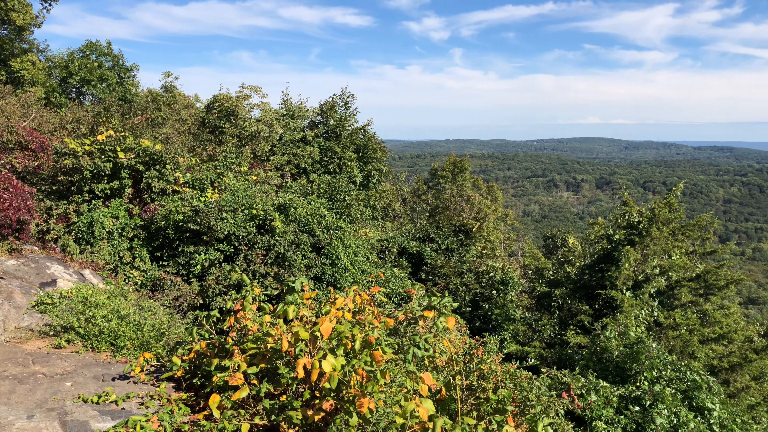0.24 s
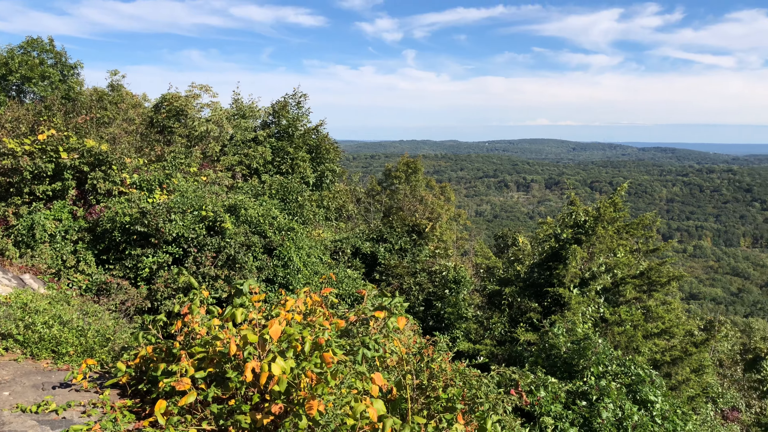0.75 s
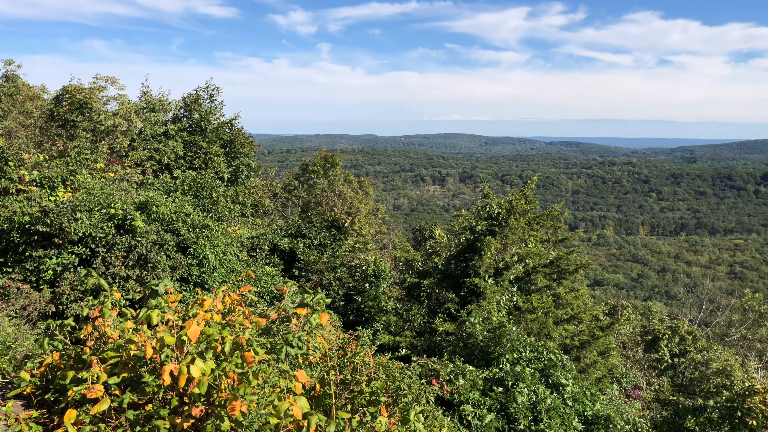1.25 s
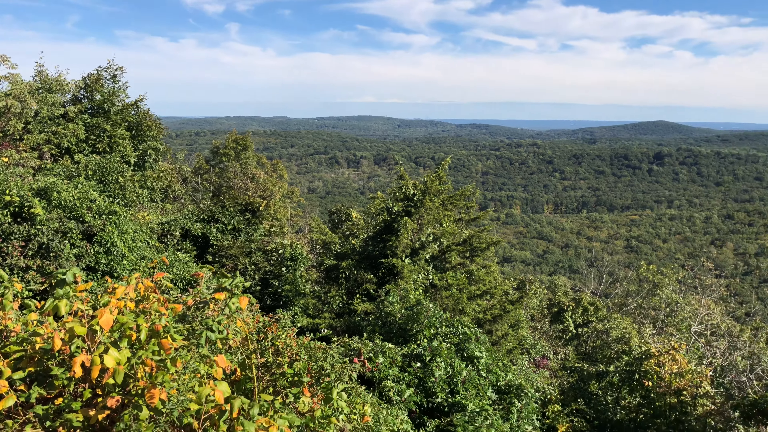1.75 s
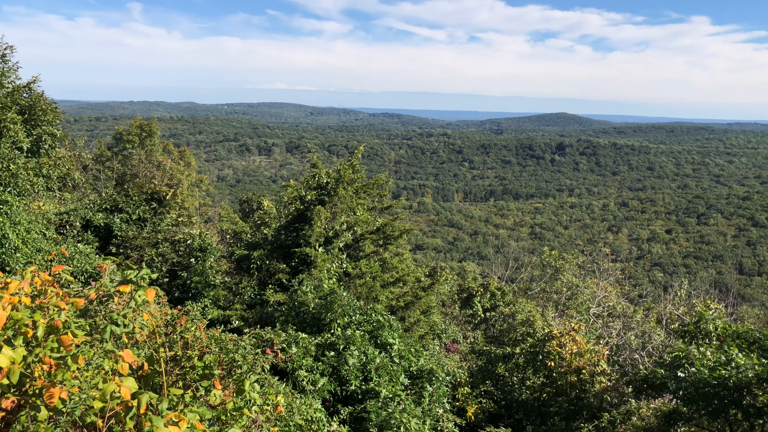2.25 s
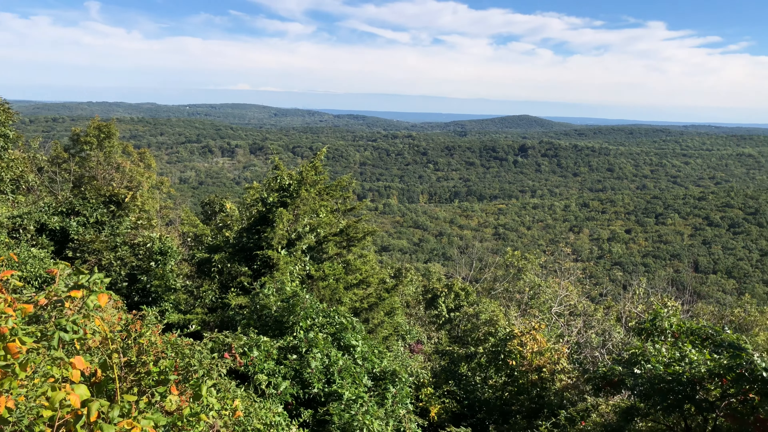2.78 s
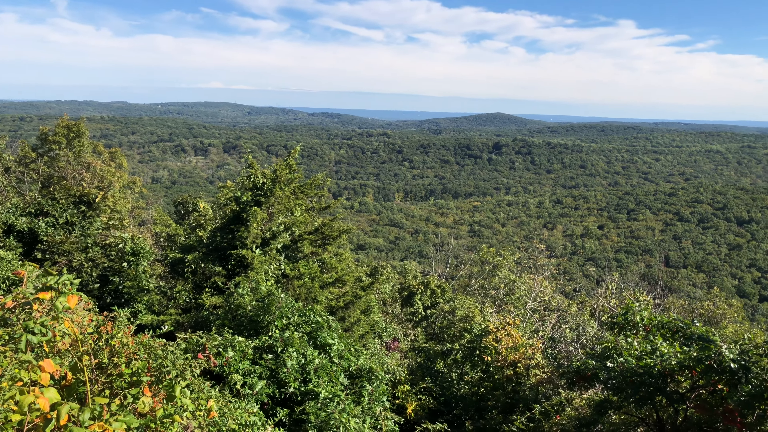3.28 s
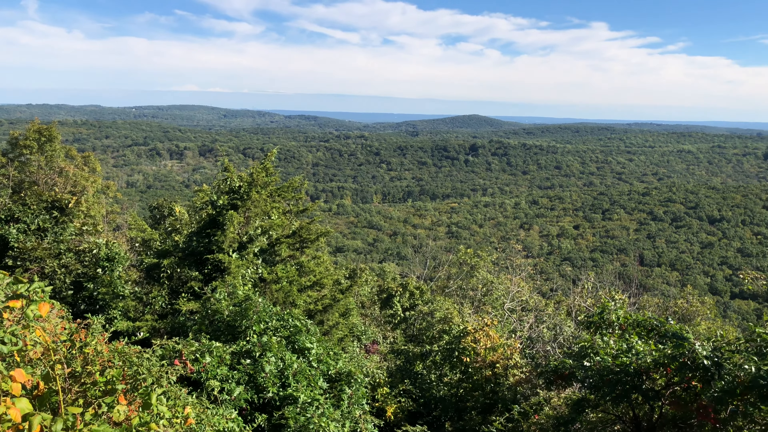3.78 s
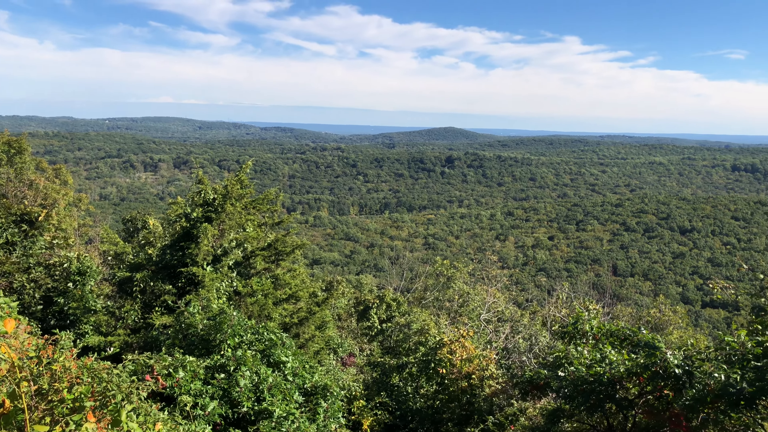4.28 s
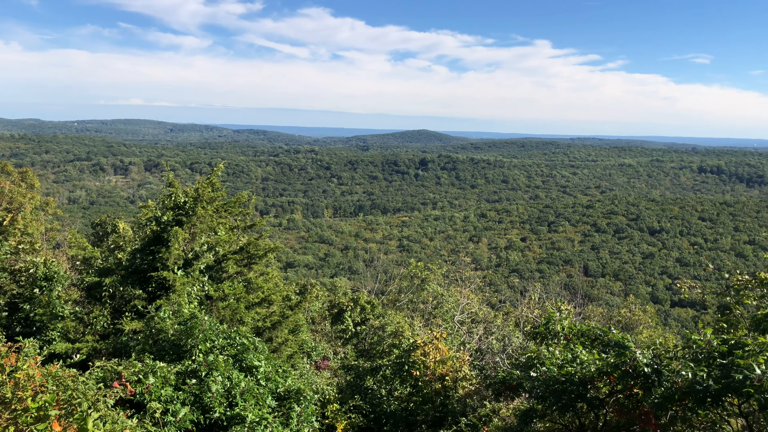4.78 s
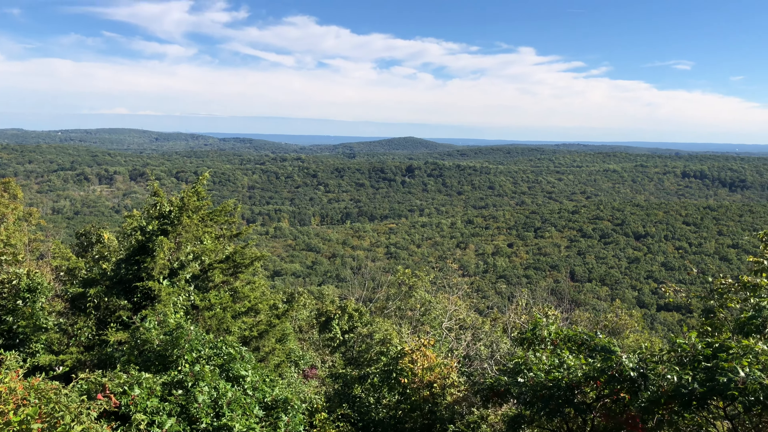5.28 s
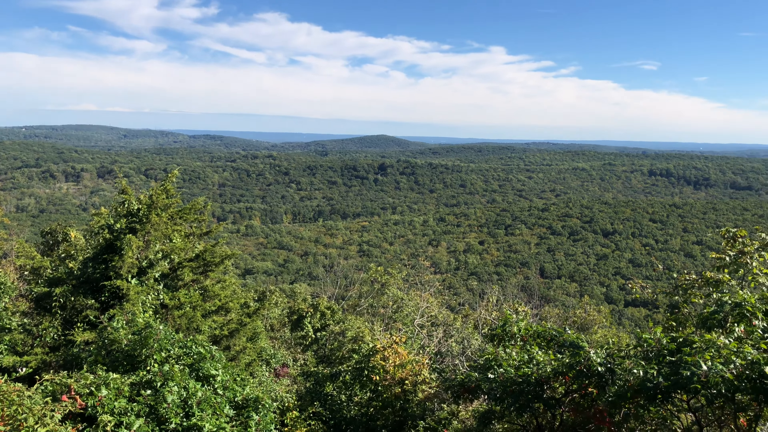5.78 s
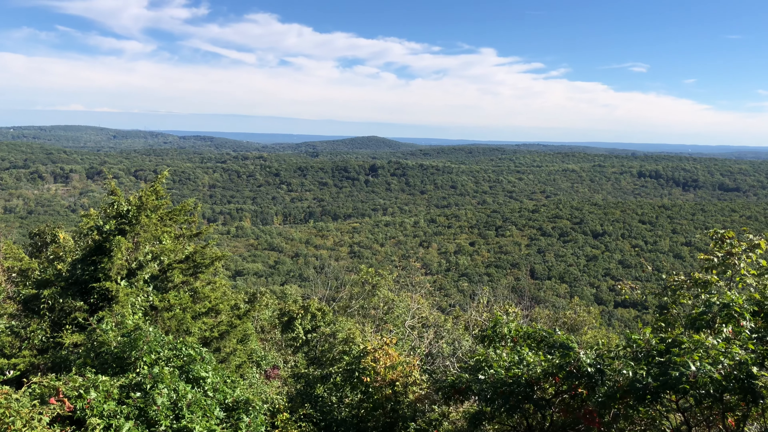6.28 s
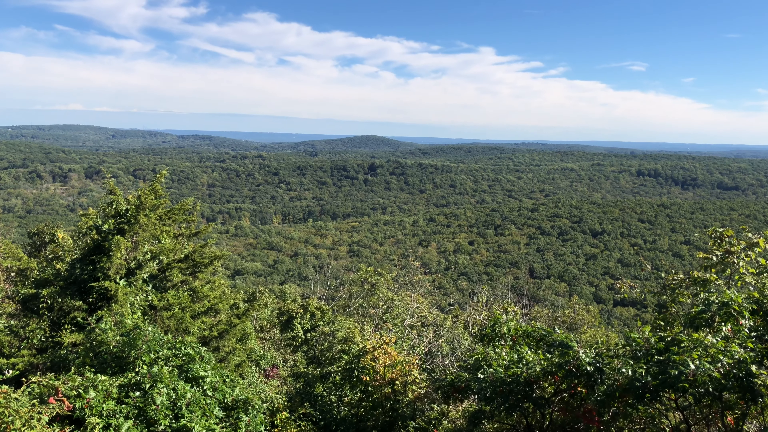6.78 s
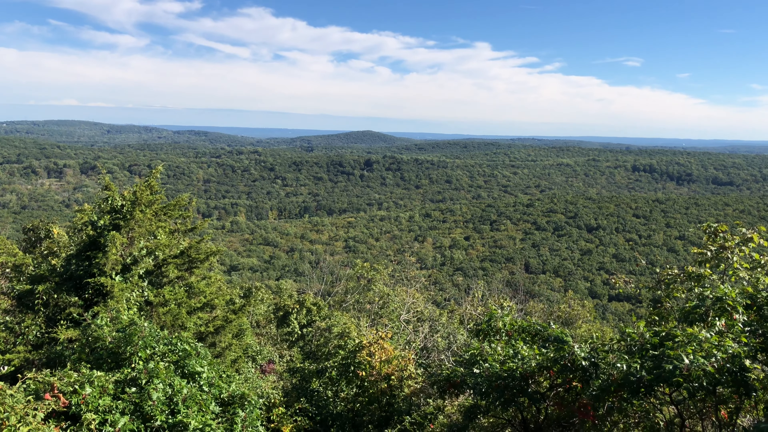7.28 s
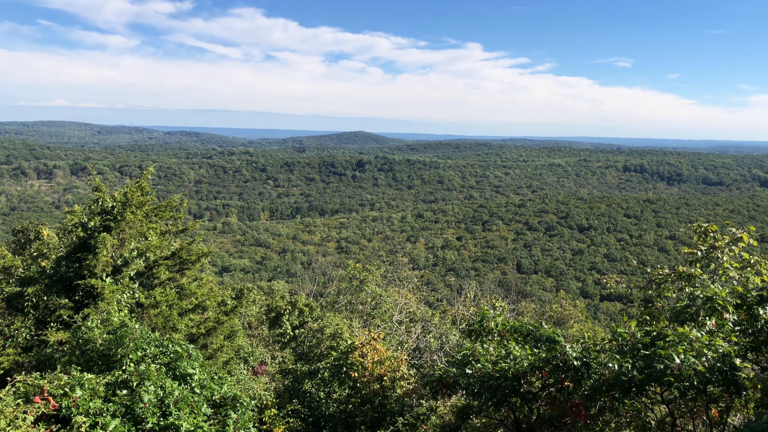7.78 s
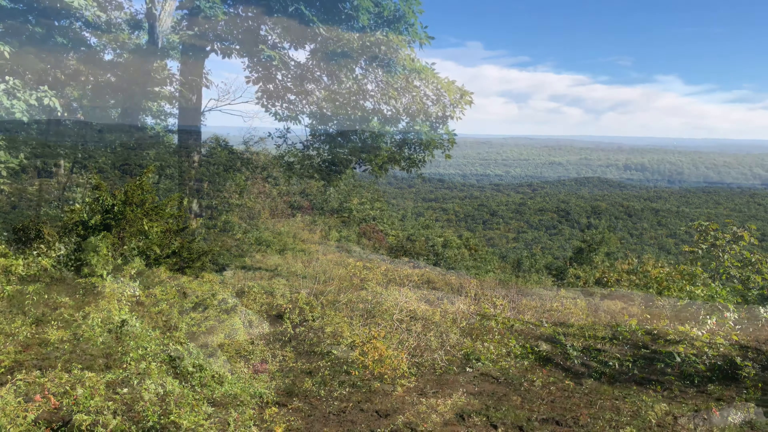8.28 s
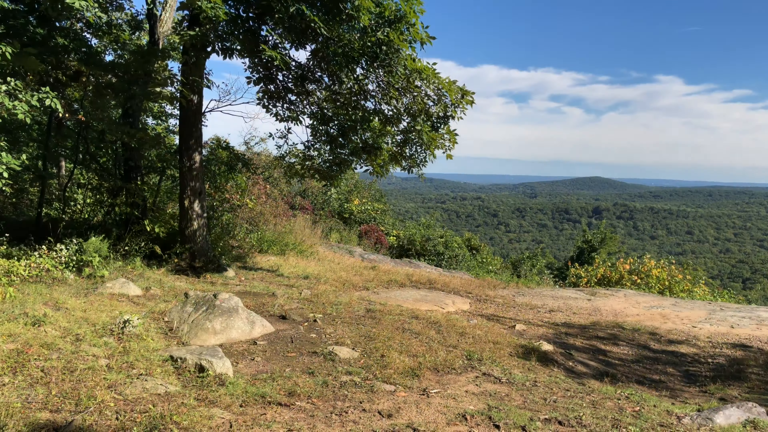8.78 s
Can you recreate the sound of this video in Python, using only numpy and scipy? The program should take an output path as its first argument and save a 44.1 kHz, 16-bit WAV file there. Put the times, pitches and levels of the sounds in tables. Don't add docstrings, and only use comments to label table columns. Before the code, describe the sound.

A continuous silvery mass of ground crickets fills open air, with a closer cricket giving quick pure-toned chirps near 4.8 kilohertz. Others flutter faintly downslope. A distant raven gives a rattling croak, later a softer one and a clipped remnant. Finger bumps and dry ticks sit close to the microphone above faint wind. Near the end, the chirper fades and higher single-note tinkles at regular paces blend in, with a brief stuttering trill.

```python
import sys
import numpy as np
from scipy import signal
from scipy.fft import rfft, irfft, next_fast_len
from scipy.io import wavfile
from scipy.ndimage import uniform_filter1d, map_coordinates

SR = 44100
rng = np.random.default_rng(int(sys.argv[2]) if len(sys.argv) > 2 else 0)


def ratio_of_db(decibels):
    return 10 ** (np.asarray(decibels, float) / 20)


def log_audio(samples):
    frames = np.atleast_2d(samples).T
    limited = np.clip(frames, -1, 1)
    pcm = np.round(limited * 32767).astype(np.int16)
    wavfile.write(sys.argv[1], SR, pcm)


N = 398663
T = np.arange(N) / SR

# (time of the middle full stroke [s], lengths of the three full strokes [ms] x 3)
NEAR_CHIRPS = [(0.1022, 20, 20, 17), (0.415, 17, 17, 17), (0.814, 19, 17.5, 20), (1.122, 11, 11, 20.5),
               (1.449, 15, 17.5, 21), (1.7912, 17, 8.7, 20), (2.096, 16, 9.3, 19), (2.447, 12, 8.7, 11),
               (2.788, 14.5, 15.5, 20.5), (3.098, 16.4, 18, 17), (3.4119, 16, 15.7, 16.5),
               (3.732, 10.3, 17.5, 18.5), (4.0724, 19.6, 8.4, 15), (4.379, 15, 18.4, 19),
               (4.7503, 16.6, 20, -2.5), (5.012, 16.4, 18, 8), (5.4656, 11, 16, 8.5), (5.829, 19, 15, 19),
               (6.163, 16, 8.6, 14.5), (6.4968, 10.6, 19, 19.5), (6.834, 21, 17, 17),
               (7.314, 11, 15.4, 18.5), (7.626, 17, 10, 15), (7.9104, 16, 13.5, 16.5), (8.221, 16, 17, 19),
               (8.526, 19, 19, 19.5)]
# (pause before the next [ms], level [dB], wing pitch at the usual length [Hz])
NEAR_STROKES = [
    (29.3, -6.5, 4830),
    (42.2, -0.95, 4830),
    (45.1, 0, 4855),
    (0, 0.5, 4865),
]
# (time [s], level [dB])
FACING = [
    (.1, -52.5),
    (.45, -49.5),
    (.8, -49),
    (1.45, -46.5),
    (1.8, -42.5),
    (2.45, -41),
    (3.1, -40),
    (9, -40),
]
LEAD_MS, USUAL_MS = 9.9, 17
LONGER_WAITS_MS, LONGER_DB, LONGER_HZ = .22, -0.2, 5.9

# (first stroke [s], time between strokes [s], stroke length [ms], level [dB])
TINKLE_HIGH = (8.162, .108, 16.5, -47)
TINKLE_MID = (8.172, .1362, 18.5, -41.5)
TINKLE_LOW = (8.087, .1577, 22.5, -58)
TINKLE_TOP = (8.206, .117, 15, -77)
# (time
# [s], length [ms], level [dB], wing pitch [Hz])
BURST_STROKES = [(8.328, 13, -59, 4750), (8.358, 21, -56.5, 4640), (8.403, 17, -57.5, 4620),
                 (8.43, 12, -61, 4600), (8.815, 11, -62, 4750), (8.829, 13, -56.5, 4700),
                 (8.858, 19, -55, 4620), (8.885, 12, -56, 4650), (8.906, 19, -51, 4640),
                 (8.934, 11, -53, 4580), (8.949, 18.7, -53, 4640), (8.97, 10, -59, 4710),
                 (8.985, 10, -59, 4620), (9.0, 15, -59, 4600), (9.02, 14, -59, 4480)]
DISSOLVE_START_S, DISSOLVE_END_S = 7.85, 8.88

# (time of the last stroke [s], length [s], level [dB])
SLOPE_CHIRPS = [(.072, .06, -68), (.592, 0.23, -65), (1.056, 0.23, -66.5), (1.443, .16, -66),
                (1.84, 0.15, -64), (2.241, 0.14, -65), (2.671, 0.21, -67), (3.14, .16, -68),
                (3.59, 0.19, -68), (3.995, 0.17, -66), (4.38, 0.19, -65), (4.824, 0.19, -64.5),
                (5.222, 0.19, -64.5), (5.647, .2, -68), (6.08, 0.18, -65.5), (6.535, .2, -65.5),
                (6.964, 0.22, -66), (7.39, .18, -65), (7.772, 0.19, -64), (8.133, 0.1, -69)]
# (time [s], length [s], level [dB])
FAR_LOW_CHIRPS = [(.072, .14, -68), (.482, .17, -74), (.872, .17, -73), (1.277, 0.18, -72),
                  (1.625, .18, -72), (2.0, .18, -70), (2.382, 0.15, -72), (2.75, 0.16, -72),
                  (3.14, .18, -72), (3.48, 0.16, -74), (3.916, .2, -73), (4.27, 0.15, -72),
                  (4.695, 0.14, -69), (5.078, 0.15, -72), (5.447, .14, -71), (5.743, 0.14, -70),
                  (6.112, .17, -72), (6.49, 0.19, -73), (6.84, .2, -75), (7.288, 0.16, -73),
                  (7.67, 0.16, -75), (8.065, .1, -72)]
# (time [s], length [s], level [dB])
FAINT_CHIRPS = [(.6, 0.13, -73), (1.03, 0.18, -73), (1.53, .17, -71), (1.9, .19, -73), (2.84, 0.13, -73),
                (3.69, 0.1, -73), (4.17, .13, -74), (4.6, 0.096, -75), (5.0, .13, -76), (5.4, 0.18, -76),
                (5.85, 0.2, -75), (6.25, 0.15, -72), (7.18, 0.16, -74)]
# (time [s], length [s], level [dB])
FAR_HIGH_CHIRPS = [(0.25, 0.076, -65), (0.496, 0.17, -67), (0.948, 0.18, -69), (1.326, 0.23, -69),
                   (1.672, 0.18, -72), (2.002, 0.15, -68), (2.369, 0.1, -66), (2.717, 0.21, -71),
                   (3.166, 0.15, -70), (3.499, 0.21, -70), (3.941, 0.15, -70), (4.297, 0.14, -68),
                   (4.621, 0.18, -69), (4.97, 0.15, -74), (5.295, 0.17, -73), (5.643, 0.12, -72),
                   (5.911, 0.2, -72), (6.243, 0.18, -71), (6.587, 0.18, -70.9), (6.935, 0.14, -70),
                   (7.241, 0.14, -72.3), (7.579, 0.2, -73), (7.908, 0.17, -72)]
# (time [s], level [dB])
GRASS_STROKES = [(1.627, -61), (1.662, -65), (2.287, -59), (2.333, -58), (3.284, -63), (3.875, -66),
                 (3.905, -65), (3.948, -62), (3.985, -62), (4.567, -63), (4.624, -56), (4.799, -60),
                 (4.841, -60), (5.113, -57), (5.15, -60), (5.189, -58), (5.243, -59), (5.555, -58),
                 (5.594, -58), (5.643, -59), (5.691, -60), (5.989, -65), (6.03, -59), (6.064, -57),
                 (6.243, -64), (6.285, -63), (6.581, -55), (6.645, -59), (6.929, -64), (6.97, -63),
                 (7.014, -58), (7.06, -57), (7.396, -59), (7.425, -58), (7.476, -56), (7.52, -56),
                 (7.713, -66), (7.751, -67), (8.001, -59), (8.044, -58), (8.085, -67)]

# (wing pitch [Hz], strokes a second [1/s], level [dB])
SINGERS = [(6850, 31.5, -11), (7260, 64, 0), (7525, 69, 1), (7750, 26, -3.5), (7070, 98, -6),
           (8100, 64, -14.5), (8204, 30, -13)]
# (time [s], level [dB])
TRILL_LEVEL = [
    (0.0, -54),
    (3.65, -55),
    (4.48, -54.5),
    (7.75, -54.5),
    (8.36, -59),
    (9.04, -56.5),
]
# (frequency [Hz], level [dB per Hz])
MASS_COLOUR = [(3710, -47), (6300, -16), (6510, -14.5), (7050, 1.5), (7500, 2.5), (7980, -5.5),
               (8550, -16.5), (9200, -16), (12000, -59), (20200, -120)]
# (time [s], level [dB])
MEADOW_LEVEL = [
    (0, -55),
    (.2, -63),
    (1.1, -60),
    (2.7, -62),
    (4.3, -61.5),
    (5.7, -62),
    (7.4, -61.5),
    (8.45, -59),
    (8.62, -58),
]
# (frequency [Hz], level [dB per Hz])
MEADOW_COLOUR = [(3900, -42), (4200, -12), (4500, -22), (4800, -14.5), (5050, -10), (5400, -34)]

# (start [s], length [s], level [dB], throbs a second [1/s])
CROAKS = [
    (2.654, 0.25, -54, 53.1),
    (4.791, .185, -61.5, 58),
    (5.245, 0.056, -62, 50),
]
# (time [s], second harmonic [Hz])
CROAK_PITCH = [(2.66, 1082), (2.75, 1131), (2.82, 1154), (2.85, 1102), (2.92, 1060), (4.8, 1015),
               (4.98, 1024), (5.25, 995)]
# (frequency [Hz], level [dB])
THROAT = [(300, -7), (550, -7), (830, -16), (1100, 0.5), (1240, -1), (1420, -9.5), (1650, -11),
          (2200, -29.5), (2900, -16.5), (3700, -23.5), (5000, -46)]

# (time [s], peak level [dB], lowest frequency [Hz], highest frequency [Hz])
KNOCKS = [(.741, -46, 110, 320), (0.772, -51, 850, 3400), (.988, -50, 650, 1100), (0.995, -51.5, 650, 1250),
          (.997, -56, 1200, 2100), (1.012, -58, 1000, 2000), (1.038, -57, 2200, 3200),
          (1.04, -42.5, 120, 700), (1.8548, -47.5, 400, 1500), (1.933, -49.5, 960, 4200),
          (1.944, -51, 900, 1900), (2.172, -40.5, 198, 1390), (2.178, -42, 130, 1200),
          (2.884, -50, 700, 840), (4.836, -46, 380, 550), (4.834, -60, 2340, 3795),
          (4.834, -58, 1300, 2000), (4.932, -53, 1180, 1450), (4.937, -62, 1690, 1900),
          (5.247, -54, 1470, 1566), (5.25, -56, 1150, 1387), (5.268, -58, 1420, 1570),
          (5.29, -62, 1420, 1600), (5.315, -64, 1420, 1600), (5.77, -50.5, 724, 880),
          (7.314, -57, 810, 1028), (7.413, -57, 520, 704), (7.45, -51, 300, 1407)]
# (time [s], peak level [dB], centre frequency [Hz])
TICKS = [(1.8527, -59, 10300), (1.9415, -61, 11200), (2.1655, -65, 9630), (3.2565, -59, 12800),
         (3.2919, -59, 10100), (3.5972, -61, 10800), (3.6311, -62, 11000), (3.6731, -61, 10800),
         (6.0876, -62, 9550), (6.1195, -60, 11000), (6.1519, -62, 9510), (6.3679, -60, 11100),
         (6.3959, -59, 9490), (6.9481, -59, 9220)]

# (time [s], level [dB])
WIND_LEVEL = [(0, -64.5), (.4, -62), (2.4, -64), (3.4, -64.5), (3.7, -56.5), (5.6, -57.5), (5.8, -67),
              (6.2, -63), (7.8, -66.5), (8.45, -66.5), (9.04, -64.5)]
# (frequency [Hz], level [dB per Hz])
RUMBLE_COLOUR = [(13, -33), (22, -25), (48, 5), (91, 7), (173, -6.5), (210, -33), (250, -27), (320, -51),
                 (550, -120)]
# (frequency [Hz], level [dB per Hz])
HUSH_COLOUR = [(35, -20), (60, -2.5), (161, 0.5), (715, -12.5), (964, -17.5), (1370, -21.5), (1880, -25.5),
               (3790, -29.5), (4000, -34), (5200, -67), (8800, -120)]
# (frequency [Hz], level [dB per Hz])
HISS_COLOUR = [(500, -19), (1200, 1.5), (2500, -5), (4000, -1.5), (5700, 3.5), (6600, 3.5), (8800, -12.5),
               (10200, -2.5), (12500, -11), (14400, -7.5), (15950, -14)]
# (time [s], length [s], highest frequency lost [Hz])
TREBLE_GAPS = [(.14, .065, 11000), (.23, .035, 9700), (.6, .045, 10200), (.68, .03, 10400),
               (.95, .03, 10400), (2.53, .02, 10300), (2.595, .05, 9900), (3.19, .055, 9900),
               (3.85, .03, 9200), (3.91, .07, 9700), (4.1, .05, 9100), (4.82, .03, 9900), (5.1, .02, 9700),
               (6.04, .03, 9900), (8.04, .12, 9900), (8.39, .05, 9600), (8.59, .055, 10200),
               (8.7, .045, 10200), (8.8, .015, 10600), (8.99, .03, 9700)]


def unit(x):
    return x / np.sqrt(np.mean(x ** 2) + 1e-20)


def curve(rows):
    return np.interp(T, *np.transpose(rows))


def wobble(rate):
    return map_coordinates(rng.standard_normal(int(N * rate / SR) + 4), [T * rate])


def coloured(x, points):
    m = next_fast_len(N + 8192)
    hz, db = np.transpose(points)
    axis = np.log(np.fft.rfftfreq(m, 1 / SR) + 1)
    gain = ratio_of_db(np.interp(axis, np.log(hz), db, -120, -120))
    return irfft(rfft(x, m) * gain, m)[:N]


def rush(points, patchy_db):
    z = signal.stft(rng.standard_normal(N), nperseg=512)[2]
    patches = uniform_filter1d(rng.standard_normal(z.shape), size=6, axis=0)
    patches = uniform_filter1d(patches, size=12, axis=1)
    noise = signal.istft(z * ratio_of_db(patchy_db * unit(patches)), nperseg=512)[1][:N]
    return unit(coloured(noise, points))


def trees(x, t60):
    t = np.arange(SR // 2) / SR
    tail = rng.standard_normal(len(t)) * ratio_of_db(-60 * t / t60) * (t > .004)
    return signal.fftconvolve(x, tail / np.linalg.norm(tail))[:N]


def arrival(s):
    return np.clip((s - DISSOLVE_START_S) / (DISSOLVE_END_S - DISSOLVE_START_S), 0, 1)


def both(first_db, second_db):
    return np.hypot(ratio_of_db(first_db) * (1 - arrival(T)), ratio_of_db(second_db) * arrival(T))


def add_stroke(out, s, ms, db, hz, sag, fall_ms, rise, second_db=-80, third_db=-80):
    t = np.arange(round((ms + 14) * SR / 1000)) / SR * 1000 - 2

    def slowing(u):
        slow_start = rise * np.exp(-np.maximum(u, 0) / 7.1)
        slow_end = sag * np.clip((u - ms) / fall_ms + 1, 0, 1.8) ** 2
        return slow_start + slow_end

    pitch = hz * (1 - slowing(t) + slowing(ms / 4))
    phase = 2 * np.pi * (np.cumsum(pitch) / SR + rng.random())
    tone = np.sin(phase) + ratio_of_db(second_db) * np.sin(2 * phase) + ratio_of_db(third_db) * np.sin(3 * phase)
    onset = np.sin(np.clip((t + 2) / 3.5, 0, 1) * np.pi / 2) ** 1.3
    end = 1 / (1 + np.exp((t - ms) / .9))
    end += (.04 + .1 * rng.random()) / (1 + np.exp((t - ms - 6) / 1.2))
    at = max(round((s - .002) * SR), 0)
    part = out[at:at + len(t)]
    part += (ratio_of_db(db) * onset * end * tone)[:len(part)]


def near_cricket():
    x = np.zeros(N)
    pause, stroke_db, stroke_hz = np.transpose(NEAR_STROKES)
    for s, *full in NEAR_CHIRPS:
        chance = rng.standard_normal((3, 4))
        ms = np.array([LEAD_MS, *full])
        over = ms - USUAL_MS
        waits = pause[:3] + LONGER_WAITS_MS * over[:3] * [0, 1, 1]
        late = np.cumsum(np.r_[0, waits])
        times = s + (late - late[2]) / 1000
        level = np.interp(s, *np.transpose(FACING)) + stroke_db + LONGER_DB * over + 0.39 * chance[0]
        pitch = stroke_hz + LONGER_HZ * over + 18 * chance[1]
        rises = 0.006 + 0.013 * chance[2]
        for time, length, db, hz, rise in zip(times, ms, level, pitch, rises):
            add_stroke(x, time, length, db, hz, sag=0.062, fall_ms=9.7, rise=rise, third_db=-38)
    x *= 1 - arrival(T)
    rock = trees(np.pad(x, (round(.021 * SR), 0))[:N], t60=.02)
    return x + x.std() * (ratio_of_db(-20) * unit(rock) + ratio_of_db(-18) * unit(trees(x, t60=0.11)))


def tinklers():
    x = np.zeros(N)
    for (first, period, ms, db), hz, sag, rise, second_db in [
            (TINKLE_HIGH, 7940, .025, .02, -80), (TINKLE_MID, 7270, .05, .004, -35),
            (TINKLE_LOW, 5990, .085, .06, -80), (TINKLE_TOP, 14500, .05, .01, -80)]:
        for k, (a, b) in enumerate(rng.standard_normal((9, 2))):
            s = min(first + k * period, T[-1] + .002)
            add_stroke(x, s, ms + 1.2 * a, db + .6 * b, hz, sag, fall_ms=11, rise=rise, second_db=second_db)
    x *= arrival(T) ** .8
    return x + ratio_of_db(-20) * trees(x, t60=0.18)


def trill_burst():
    x = np.zeros(N)
    for s, ms, db, hz in BURST_STROKES:
        add_stroke(x, s, ms, db, hz, sag=0.09, fall_ms=17, rise=.003)
    x += ratio_of_db(-11) * np.roll(x, round(.0125 * SR)) * (T > 8)
    x = ratio_of_db(2.2 * wobble(170)) * x + ratio_of_db(-5) * trees(x, t60=.05)
    return x + ratio_of_db(-11) * trees(x, t60=0.13)


def chirps(rows, hz, gap_s, ms, boost_db, wet_db, climb, back=False, sag=-0.017, second_db=-60):
    x = np.zeros(N)
    for s, length, db in rows:
        for late in np.arange(0, length, gap_s):
            at = s - late if back else s + late
            along = (at - s + length * back) / length
            note = hz * (1 + climb * (along - .6) + rng.normal(0, .003))
            level = db + boost_db - 2.5 * (1 - along) ** 3 + rng.normal(0, 0.86)
            add_stroke(x, at + rng.normal(0, .002), ms, level, note, sag=sag, fall_ms=ms, rise=0.01,
                       second_db=second_db)
    x *= ratio_of_db(2.2 * wobble(70))
    return x + ratio_of_db(wet_db) * x.std() * unit(trees(x, t60=0.18))


def far_crickets():
    x = chirps(SLOPE_CHIRPS, 5110, gap_s=.0368, ms=15, boost_db=4.0, wet_db=-11, climb=.009, back=True,
               sag=-.008, second_db=-17)
    x += chirps(FAR_LOW_CHIRPS, 5400, gap_s=.037, ms=25, boost_db=2.5, wet_db=1, climb=.004, sag=-.002)
    x += chirps(FAINT_CHIRPS, 6010, gap_s=0.021, ms=13, boost_db=2.5, wet_db=-10.0, climb=0.0086)
    x += chirps(FAR_HIGH_CHIRPS, 6170, gap_s=.030, ms=25.0, boost_db=-1.5, wet_db=1.0, climb=0.013)
    return x


def grass_cricket():
    x = np.zeros(N)
    for s, db in GRASS_STROKES:
        add_stroke(x, s, 15, db - 0.5, 4520 + 25 * rng.standard_normal(), sag=0.051, fall_ms=13, rise=.003)
    return x + ratio_of_db(-6) * x.std() * unit(trees(x, t60=.1))


def throbs():
    rattle = np.zeros(N)
    for start, length, db, rate in CROAKS:
        for k, (a, b) in enumerate(rng.standard_normal((16, 2))):
            late = (k + 0.76 + 0.07 * a) / rate
            swell = (late / .03) ** .6
            fade = (length - late) / .025
            size = np.clip(min(swell, fade), 0, 1)
            level = db + 0.62 * b + 5 * late / length
            rattle += size * ratio_of_db(level) * np.exp(-((T - start - late) / 0.0075) ** 2)
    return rattle


def raven():
    rattle = throbs()
    effort = uniform_filter1d(rattle, size=3000)
    strain = np.abs(effort) / effort.max()
    bright = strain ** 1.7
    shake = (.022 - .008 * bright ** .3) * wobble(160)
    phase = np.pi * np.cumsum(curve(CROAK_PITCH) * (1 + shake)) / SR
    voice = (0.39 + 0.26 * bright ** .2) * ratio_of_db(2.7 * wobble(60)) * np.cos(phase)
    voice += 1.2 * np.cos(2 * phase)
    voice += 0.38 * sum(np.cos((k + .5) * phase) for k in range(1, 4))
    voice += bright * (.6 * np.cos(3 * phase) + .3 * np.cos(5 * phase) + 0.2 * np.cos(6 * phase))
    breath = 2.13 * rng.standard_normal(N) * (rattle + effort) * strain ** 0.34
    x = coloured((voice * rattle + breath) * ratio_of_db(4.5), THROAT)
    valley = unit(trees(np.pad(x, (2500, 0))[:N], t60=1.4))
    return x + x.std() * (ratio_of_db(-4.5) * unit(trees(x, t60=0.2)) + ratio_of_db(-13.5) * valley)


def hands():
    x = np.zeros(N)
    t = np.arange(1300) / SR
    ticks = [(s, db + 4.5, 0.92 * hz, 1.1 * hz) for s, db, hz in TICKS]
    for s, db, low_hz, high_hz in KNOCKS + ticks:
        decay = ratio_of_db(-60 * t / (0.012 + 45 / max(high_hz, 900)))
        jolt = (rng.standard_normal(len(t)) + 12000 / high_hz * (t == 0)) * decay
        soft = signal.butter(1, low_hz, fs=SR, output="sos")
        band = signal.butter(3, [low_hz, high_hz], "band", fs=SR, output="sos")
        jolt = signal.sosfilt(band, signal.sosfilt(soft, jolt))
        x[round(s * SR):][:len(t)] += ratio_of_db(db) * jolt / np.abs(jolt).max()
    return x


def trill():
    x = np.zeros(N)
    for hz, rate, db in SINGERS:
        pace = rate * (1 + .025 * wobble(.6) - .007 * (T - 4))
        beat = np.cumsum(pace) / SR % 1
        pitch = hz * (1 - .024 * (beat - .35) + .004 * wobble(25))
        tone = np.sin(2 * np.pi * np.cumsum(pitch) / SR)
        stroke = np.sin(np.pi * np.clip(beat / 0.56, 0, 1))
        x += ratio_of_db(db + 1.1 * wobble(1.4) + 0.94 * wobble(30)) * stroke * tone
    blur = unit(x) + ratio_of_db(-7.0) * unit(trees(x, t60=0.37)) + ratio_of_db(-2.0) * rush(MASS_COLOUR, patchy_db=1.5)
    return ratio_of_db(curve(TRILL_LEVEL)) * unit(blur)


def meadow():
    x = np.zeros(N)
    for s, pitch, size in rng.random((750, 3)):
        add_stroke(x, s * T[-1], 14, 4 * size, 4480 + 370 * pitch, sag=0.055, fall_ms=12, rise=0.0024)
    blur = unit(x) + ratio_of_db(3.0) * unit(trees(x, t60=0.14)) + ratio_of_db(2.0) * rush(MEADOW_COLOUR, patchy_db=3.5)
    return ratio_of_db(curve(MEADOW_LEVEL) - 3.0) * (1 - arrival(T)) * unit(blur)


def air():
    wind_db = curve(WIND_LEVEL)
    rumble = ratio_of_db(wind_db + 1.5 * wobble(3.76)) * rush(RUMBLE_COLOUR, patchy_db=-1.5)
    hush_swing_db = 0.13 * (wind_db - wind_db.mean())
    hush = both(-60.5, -62) * ratio_of_db(3.5 + hush_swing_db) * rush(HUSH_COLOUR, patchy_db=0.98)
    hiss = rush(HISS_COLOUR, patchy_db=.5)
    high = coloured(hiss, [(8800, -24), (9400, 2), (10400, 4.0), (12000, -2.0), (16000, 0.5)])
    hiss = hiss - 0.42 * arrival(T) * high
    hiss_gain = both(-68 + 0.3 * (T - 4), -63.5)
    return rumble + hush + hiss_gain * ratio_of_db(1.16 * wobble(11)) * hiss


def scene():
    crickets = near_cricket() + tinklers() + trill_burst() + far_crickets() + grass_cricket()
    return (crickets + raven() + hands() + trill() + meadow() + air())[None]


def low_pass(x):
    return signal.sosfilt(signal.butter(12, 16000, fs=SR, output="sos"), x)


def record(dry):
    hz, t, z = signal.stft(dry, SR, nperseg=512)
    for s, length, top_hz in TREBLE_GAPS:
        for low_hz in range(8650, top_hz, 450):
            late, early = rng.random(2)
            before = t < s + (.3 * late - .1) * length
            after = t > s + (1.15 - .3 * early) * length
            z[0, (hz >= low_hz) & (hz < low_hz + 450)] *= before | after
    mix = signal.istft(z, SR, nperseg=512)[1][:, :N]
    return low_pass(mix)


dry = scene()
out = record(dry)
log_audio(out)
```